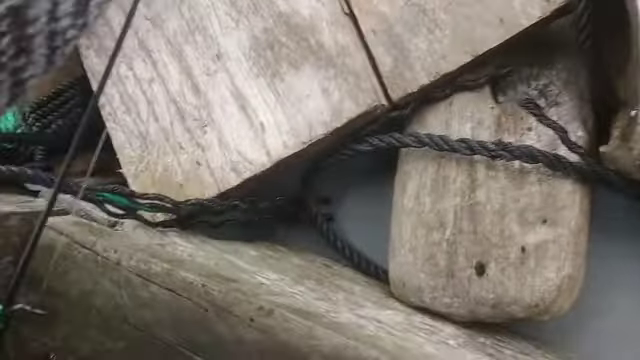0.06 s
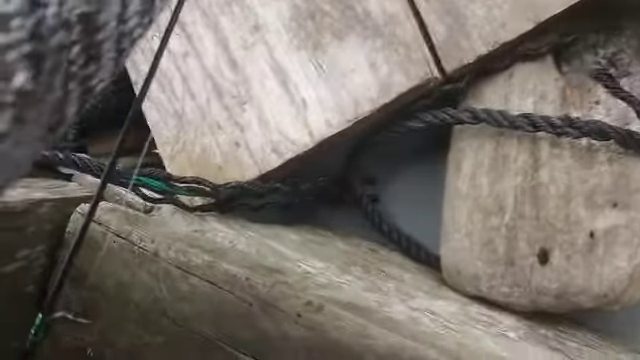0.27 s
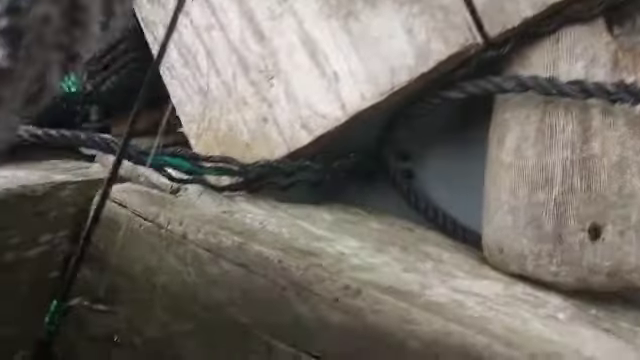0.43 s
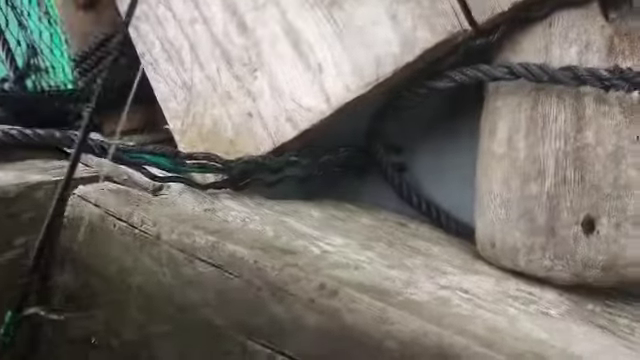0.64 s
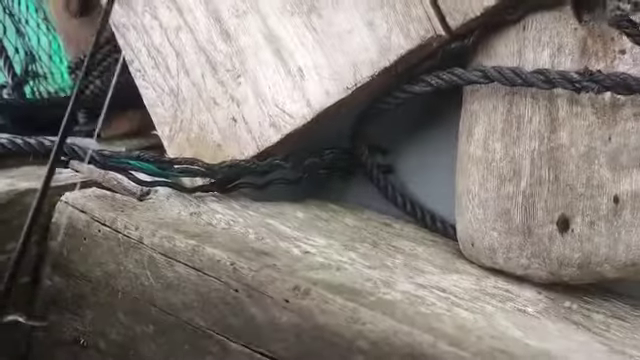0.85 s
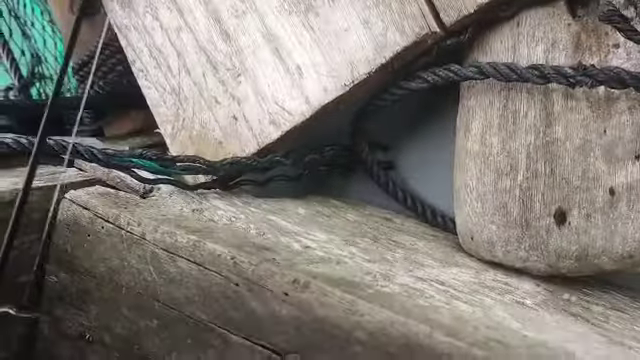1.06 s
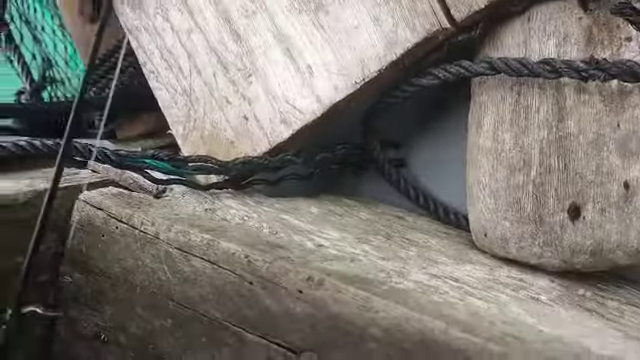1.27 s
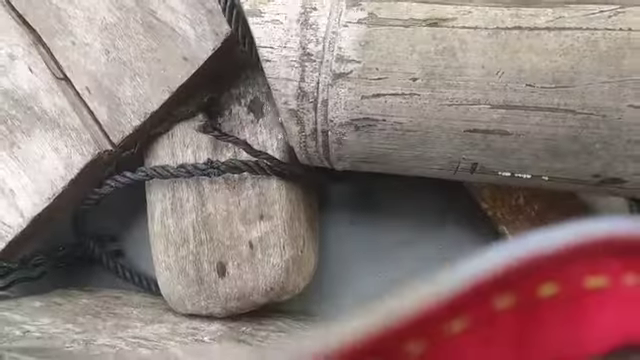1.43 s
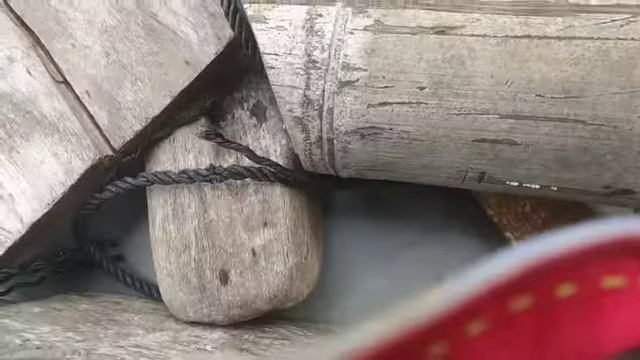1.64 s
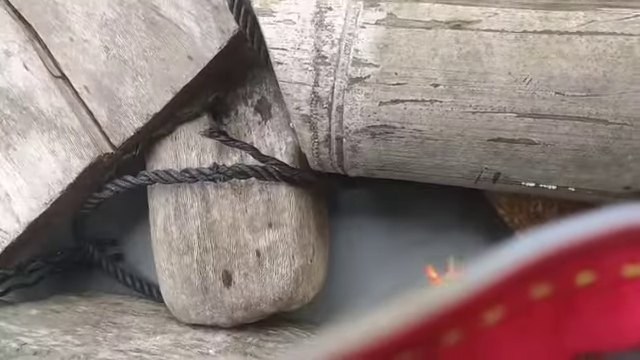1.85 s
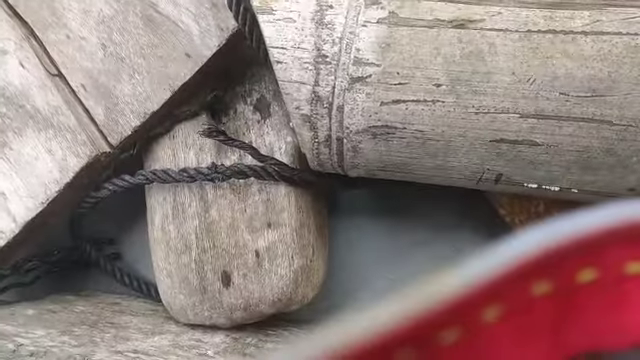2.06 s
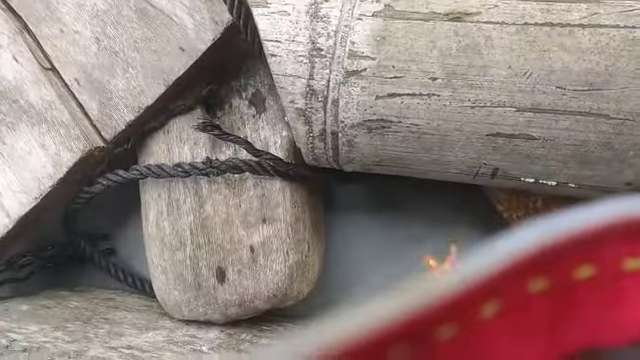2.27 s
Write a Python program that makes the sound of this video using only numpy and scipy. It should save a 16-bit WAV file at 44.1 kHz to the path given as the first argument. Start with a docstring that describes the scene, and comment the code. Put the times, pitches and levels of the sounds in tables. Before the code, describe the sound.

Water slops and splashes against a wooden raft, with a boat engine chugging far off.

```python
"""Lake water slops between the planks and floats of a wooden raft, close by.
Each slap throws spray and traps air that rings as short bubbles; the wood taps faintly and a last
drop falls. Far off, a boat engine chugs steadily, a thump and a puff per firing, under a faint hiss."""
import sys
import numpy as np
from scipy import signal
from scipy.io import wavfile

SR = 44100
rng = np.random.default_rng(int(sys.argv[2]) if len(sys.argv) > 2 else 0)


def to_wav(s):
    """Save 16-bit WAV."""
    ch = np.atleast_2d(s).T  # columns
    pcm = np.round(np.clip(ch, -1, 1) * 32767)  # PCM
    wavfile.write(sys.argv[1], SR, pcm.astype(np.int16))


N = 101429
T = np.arange(N) / SR

# Engine speed. Each row: time in seconds, firings per second.
FIRING_RATE_HZ = [(0, 40.6), (1.1, 41.2), (1.6, 40.3), (1.95, 39.7), (2.1, 38.9), (2.3, 40)]
# Engine loudness. Each row: time in seconds, level in dB.
ENGINE_LEVEL_DB = [(0, -36.5), (.15, -42.5), (.35, -40.5), (1.0, -38.5), (1.4, -40), (1.65, -44.5),
                   (2.3, -46)]
# Distant exhaust. Each row: frequency in Hz, relative gain in dB.
EXHAUST_SPECTRUM = [(30, -72), (50, -30), (80, -18), (125, 1), (165, 1.5), (200, 0), (245, 3), (315, -2.5),
                    (370, -10), (450, -23), (700, -52), (3000, -106.5)]
# Open-air hiss. Each row: frequency in Hz, relative density in dB.
AIR_SPECTRUM = [(30, -6.5), (100, 16), (500, -2), (900, -4), (1600, -11.5), (2900, -18.5), (4200, -40),
                (7000, -27), (15000, -43)]
# Water motion. Each row: time in seconds, then low, middle and treble relative levels in dB.
CHURN_LEVELS_DB = [(0, -41.5, -63, -65.5), (.16, -63.5, -61.5, -71.5), (.29, -49, -54, -64.5),
                   (.395, -50.5, -54, -67.5), (.43, -41.5, -67, -54), (.505, -39, -40.5, -56.5),
                   (0.569, -32, -38.5, -52.5), (.65, -27, -45.5, -53), (0.703, -28, -35, -44.5),
                   (0.751, -31.5, -50.5, -56), (.79, -37.5, -29, -42), (0.832, -24.5, -35.5, -42),
                   (0.903, -53, -48, -56), (.94, -41, -50, -51.5), (1.027, -52.5, -38.5, -45),
                   (1.116, -44, -57, -62), (1.185, -46.5, -40, -54.5), (1.26, -54, -52.5, -54),
                   (1.41, -80, -51.5, -65.5), (1.455, -63, -58, -65), (1.52, -57, -61, -69),
                   (1.601, -84, -71, -75)]
# Centres of the low, middle and treble bands in Hz.
CHURN_CENTRES_HZ = [500, 2270, 3260]
# Bubble swarm balance. Each row: pitch in Hz, relative level per octave band in dB.
SWARM_SPECTRUM = [(140, -1.5), (300, -4), (600, -2.5), (1000, -2), (1500, -1), (2000, -0.5), (2700, 5.5),
                  (3300, 0), (4200, -6.5), (6000, -10.5), (9000, -3), (15000, -4)]
# Spray and fizz. Each row: frequency in Hz, relative density in dB.
SPRAY_SPECTRUM = [(1500, -36), (3200, 15.5), (4200, 1.5), (6000, -1.5), (8000, 0.5), (11000, -1),
                  (16000, -11)]
# Taps of wood and falling drops. Each row: start in seconds, knock in dB, click in dB,
# click decay in seconds.
TAP_EVENTS = [(0.0371, -41.5, -46.5, 0.0025), (0.2257, -30.5, -37, 0.0028), (0.2394, -31.5, -38.5, 0.0014),
              (.2505, -34.5, -42.5, 0.0054), (0.2699, -36, -47, 0.0025), (0.328, -47, -45.5, 0.0025),
              (1.307, -54, -41, 0.011), (1.883, -68, -58, 0.0024), (2.0397, -65, -51, 0.0019)]
# Wood resonances. Each row: frequency in Hz, relative level in dB, time to fall 60 dB in seconds.
WOOD_MODES = [(427, 1, 0.048), (730, 2.5, 0.06), (903, 7.5, 0.022), (1105, 9, 0.024), (1318, 4.5, 0.049),
              (1660, 7.5, 0.024), (1995, 9.5, 0.01), (2540, -1, 0.028), (3120, 0, 0.0095)]
# Click of a tap. Each row: frequency in Hz, relative density in dB.
CLICK_SPECTRUM = [(1500, -20), (4000, 0.5), (6500, -3), (8200, 4.5), (11000, -7.5), (16000, -10)]
# Wavelets hitting wood. Each row: start in seconds, body in dB, spray in dB, rise and decay in seconds.
SLAP_EVENTS = [(0.183, -46.5, -56, 0.0095, 0.01), (0.404, -26.5, -38, 0.0036, 0.016),
               (0.45, -26, -48, 0.0016, 0.021), (0.53, -24.5, -36.5, 0.0032, 0.014),
               (0.6, -32, -35.5, 0.0013, 0.02), (0.6684, -27, -33, 0.0023, 0.014),
               (0.777, -24, -52, 0.0028, 0.0042), (0.822, -31.5, -42, 0.0019, 0.012),
               (1.150, -25.5, -51, 0.0024, 0.0068), (1.161, -31, -43, 0.0037, 0.0091),
               (1.286, -34, -54.5, 0.006, 0.022), (1.314, -34, -52, 0.0032, 0.0038),
               (1.363, -48, -48.5, 0.0017, 0.018), (1.392, -35, -51, 0.0042, 0.017),
               (1.405, -36.5, -75, 0.0028, 0.0048), (1.469, -47, -47.5, 0.005, 0.014)]
# Body of a slap. Each row: frequency in Hz, relative density in dB.
SLAP_SPECTRUM = [(150, -21), (400, 16), (750, 2), (1300, 7.5), (1900, 3), (2700, 1), (3400, -24),
                 (4300, -21.5), (8000, -29.5)]
# Distinct air pockets and drops. Each row: start in seconds, pitch in Hz, level in dB,
# decay in seconds, glide in octaves per second.
PLOP_EVENTS = [(.243, 398, -34.5, 0.022, -0.5), (0.329, 2820, -21, 0.00065, 0),
               (.368, 2300, -37.5, .005, 1), (0.406, 1390, -5, 0.0012, 6), (0.4086, 3155, -21, 0.0026, -14),
               (0.4158, 1273, -19, 0.0058, 18), (0.431, 3000, -17.5, 0.0026, 15),
               (0.47, 1157, -28, 0.01, 3.5), (0.53, 1185, -16.5, 0.0017, -2),
               (0.5984, 626, -13.5, 0.0038, -5), (0.6019, 364.6, -18, 0.017, -6),
               (0.6055, 2510, -4.5, 0.00079, -12), (0.6183, 1520, -12.5, 0.0026, 18),
               (0.624, 435, -2, 0.0024, 5), (.6233, 875, -5.5, 0.0014, 12), (0.641, 240, -25, 0.019, -24),
               (0.67, 270, -11, 0.0086, 20.5), (.679, 537, -20, 0.0061, 7), (.684, 383, -10, 0.0087, 10.5),
               (.6989, 587, -6, 0.0028, -23), (0.706, 394, -15, 0.011, -11.5),
               (0.76, 282, -8.5, 0.0073, 28), (.7761, 473, -18.5, 0.013, 20.5),
               (0.8128, 375, -11, 0.0075, 8), (.8129, 583, -10, 0.0051, 1), (0.8153, 1050, -13, 0.00069, 2),
               (0.8212, 2530, -17.5, 0.0041, -14), (0.8239, 457, -12, 0.0022, -3),
               (1.1498, 1063, -6, 0.00097, -14), (1.1518, 585, -14.5, 0.011, 4),
               (1.1624, 638, -14, 0.009, 16.5), (1.1636, 2370, -11.5, 0.00072, 0),
               (1.291, 1110, -29.5, 0.012, -1), (1.314, 2614, -23, 0.0027, 17),
               (1.347, 643, -24, 0.0068, 1), (1.3564, 358, -12, 0.0057, 11), (1.392, 573, -21, 0.009, 4),
               (1.4075, 647, -7, 0.0021, -19), (1.8806, 3550, -45, 0.0027, 1),
               (2.0401, 2367, -23, 0.0019, -36)]
# Microphone response. Each row: frequency in Hz, gain in dB.
MIC_RESPONSE = [(15, -11), (45, -8.5), (80, 0), (7300, 0.5), (8300, 5.5), (9200, 2), (10200, -3.5),
                (13000, -1.5), (15000, 6), (16000, 3)]


def amp(db):
    """Decibels to gain."""
    return 10 ** (np.asarray(db) / 20)


def unit_rms(x):
    """Scale to rms 1."""
    return x / np.sqrt(np.mean(x ** 2) + 1e-20)


def spectrum_db(spectrum, hz):
    """Interpolate a spectrum over log frequency."""
    knots_hz, db = np.transpose(spectrum)
    return np.interp(np.log(hz + 1), np.log(knots_hz + 1), db)


def add(mix, start_s, sound):
    """Mix a sound in at start_s."""
    part = mix[max(round(start_s * SR), 0):][:len(sound)]
    part += sound[:len(part)]


def colour(x, spectrum, size=4096):
    """Minimum-phase filter with the given spectrum."""
    log_gain = np.log(amp(spectrum_db(spectrum, abs(np.fft.fftfreq(size, 1 / SR)))))
    impulse = np.fft.ifft(np.exp(signal.hilbert(log_gain).conj())).real
    return signal.fftconvolve(x, impulse)[:len(x)]


def noise(spectrum):
    """Coloured noise, rms 1."""
    return unit_rms(colour(rng.standard_normal(N), spectrum))


def burst(start_s, rise_s, decay_s):
    """Linear rise, exponential fall."""
    age_s = T - start_s
    return np.clip(age_s / rise_s, 0, 1) * np.exp(-np.maximum(age_s - rise_s, 0) / decay_s)


def engine(max_firings=120, jitter_s=0.00041, uneven_db=4.5, echo_s=0.0132, echo_db=-13, puff_s=0.053):
    """Uneven firings, each a thump and a puff, dulled by distance and echoed once."""
    cycles = np.cumsum(np.interp(T, *np.transpose(FIRING_RATE_HZ))) / SR
    firings_s = T[1:][np.diff(np.floor(cycles)) > 0]
    thumps = np.zeros(N)
    for due_s, (late, strong) in zip(firings_s, rng.standard_normal((max_firings, 2))):
        start_s, db = due_s + jitter_s * late, uneven_db * strong
        add(thumps, start_s, amp([db]))
        add(thumps, start_s + echo_s, amp([db + echo_db]))
    puff_envelope = signal.lfilter([1], [1, -np.exp(-1 / (puff_s * SR))], thumps)
    puffs = puff_envelope * rng.standard_normal(N)
    exhaust = colour(unit_rms(thumps) + 0.95 * unit_rms(puffs), EXHAUST_SPECTRUM)
    return amp(np.interp(T, *np.transpose(ENGINE_LEVEL_DB))) * unit_rms(exhaust)


def air(level_db=-55.5):
    """Faint hiss of the open lake."""
    return amp(level_db) * noise(AIR_SPECTRUM)


def bubble(hz, decay_s, glide_oct_per_s, wobble=np.zeros((2, 1)), wobble_oct=0.05, wobble_db=1.5):
    """Trapped air rings and glides as it dies; the two wobble rows bend pitch and level."""
    t = np.arange(0, 7 * decay_s, 1 / SR)
    # One wobble point per 1.5 cycles.
    bend, swell = (np.interp(t * hz / 1.5, np.arange(len(row)), row) for row in wobble)
    octaves = glide_oct_per_s * np.minimum(t, 3 * decay_s) + wobble_oct * bend
    cycles = np.cumsum(hz * 2 ** octaves) / SR
    envelope = (1 - np.exp(-t * hz)) * np.exp(-t / decay_s)
    return amp(wobble_db * swell) * envelope * np.sin(2 * np.pi * cycles)


def churn(sizes=110, rate_at_1khz_per_s=27, spread_db=3.3, ring_at_1khz_cycles=4.3, gain_db=-14):
    """Swarms of small bubbles of every size follow the motion of the water."""
    times_s, *bands_db = np.transpose(CHURN_LEVELS_DB)
    bands_db = np.array([np.interp(T, times_s, band) for band in bands_db])
    swarm = np.zeros(N)
    for hz in np.geomspace(170, 15500, sizes):
        khz = hz / 1000
        onsets = np.flatnonzero(rng.random(N) < rate_at_1khz_per_s * khz ** 0.8 / SR)
        strength = rng.standard_normal(N)[onsets]
        pops = np.zeros(N)
        pops[onsets] = np.sign(strength) * amp(spread_db * np.minimum(strength ** 2, 3))
        pops = unit_rms(pops)
        shares = np.array([np.interp(np.log(hz), np.log(CHURN_CENTRES_HZ), row) for row in np.eye(3)])
        pops[onsets] *= amp(shares @ bands_db[:, onsets] + spectrum_db(SWARM_SPECTRUM, hz))
        decay_s = ring_at_1khz_cycles * khz ** 0.37 / hz
        ring = bubble(hz, decay_s, glide_oct_per_s=0.047 / decay_s)
        swarm += signal.oaconvolve(pops, ring / np.linalg.norm(ring))[:N]
    return amp(gain_db) * swarm


def fizz(gain_db=-8, flicker_db=5.5, flicker_s=0.011):
    """Fine, flickering fizz follows the treble of the churning water."""
    times_s, *_, treble_db = np.transpose(CHURN_LEVELS_DB)
    flicker = np.interp(T, np.arange(N) * flicker_s, rng.standard_normal(N))
    level_db = gain_db + np.interp(T, times_s, treble_db) + flicker_db * flicker
    return amp(level_db) * noise(SPRAY_SPECTRUM)


def droplets(count=150, low_hz=3000, high_hz=11050, gain_db=7, spread_db=12):
    """Tiny drops tick back onto the surface; their level follows the spray that throws them."""
    times_s, *_, treble_db = np.transpose(CHURN_LEVELS_DB)
    ticks = np.zeros(N)
    for when, pitch, strength in rng.random((count, 3)):
        start_s = when * times_s[-1]
        hz = low_hz * (high_hz / low_hz) ** pitch
        db = np.interp(start_s, times_s, treble_db) + gain_db + spread_db * strength ** 2
        add(ticks, start_s, amp(db) * bubble(hz, decay_s=0.0005, glide_oct_per_s=0))
    return ticks


def taps(rise_s=0.0008):
    """Each tap clicks and rings a few short modes of the wood."""
    t, knocks = T[:SR // 5], np.zeros(N)
    for start_s, knock_db, _, _ in TAP_EVENTS:
        ring = sum(amp(db - 60 * t / t60_s) * np.sin(2 * np.pi * (hz * t + rng.random()))
                   for hz, db, t60_s in WOOD_MODES)
        ring *= np.minimum(t / rise_s, 1)
        add(knocks, start_s, amp(knock_db) * ring / np.std(ring[:SR // 200]))  # level over first 5 ms
    clicks = sum(amp(db) * burst(start_s, rise_s, decay_s) for start_s, _, db, decay_s in TAP_EVENTS)
    return knocks + clicks * noise(CLICK_SPECTRUM)


def slaps():
    """Wavelets hit the wood: a dull smack with a fizz of spray."""
    body, spray = np.zeros((2, N))
    for start_s, body_db, spray_db, rise_s, decay_s in SLAP_EVENTS:
        envelope = burst(start_s, rise_s, decay_s)
        body += amp(body_db) * envelope
        spray += amp(spray_db) * envelope
    return body * noise(SLAP_SPECTRUM) + spray * noise(SPRAY_SPECTRUM)


def plops(wobble_below_hz=500):
    """Air pockets and single drops ring once; large pockets wobble as they change shape."""
    rings = np.zeros(N)
    for start_s, hz, db, decay_s, glide_oct_per_s in PLOP_EVENTS:
        wobble = (hz < wobble_below_hz) * rng.standard_normal((2, 32))
        add(rings, start_s, amp(db) * bubble(hz, decay_s, glide_oct_per_s, wobble))
    return rings


def plank_echoes(x, level_db=-13, decay_s=0.015, gap_s=0.002, density=0.06):
    """Add quick reflections scattered between planks and water."""
    t = T[:SR // 6]
    reflections = rng.standard_normal(len(t)) * (rng.random(len(t)) < density)
    tail = reflections * np.exp(-t / decay_s) * (t > gap_s)
    return x + amp(level_db) * signal.fftconvolve(x, tail / np.linalg.norm(tail))[:N]


def scene():
    """Water and wood close by, engine and air behind; mono."""
    raft = plops() + slaps() + churn() + fizz() + droplets() + taps()
    return (plank_echoes(raft) + engine() + air())[None]


def record(dry, cutoff_hz=15800):
    """Microphone bass roll-off and treble peaks, then a low-pass."""
    lowpass = signal.firwin(511, cutoff_hz, window=("kaiser", 9), fs=SR)
    return signal.oaconvolve(colour(dry[0], MIC_RESPONSE), lowpass, "same")[None]


dry = scene()
out = record(dry)
to_wav(out)
```